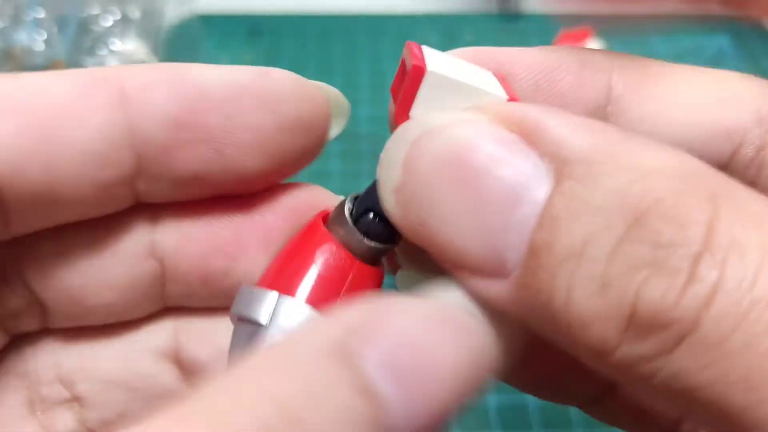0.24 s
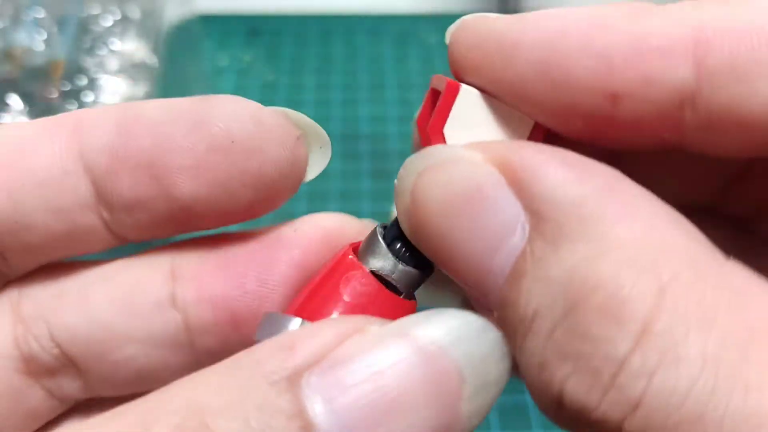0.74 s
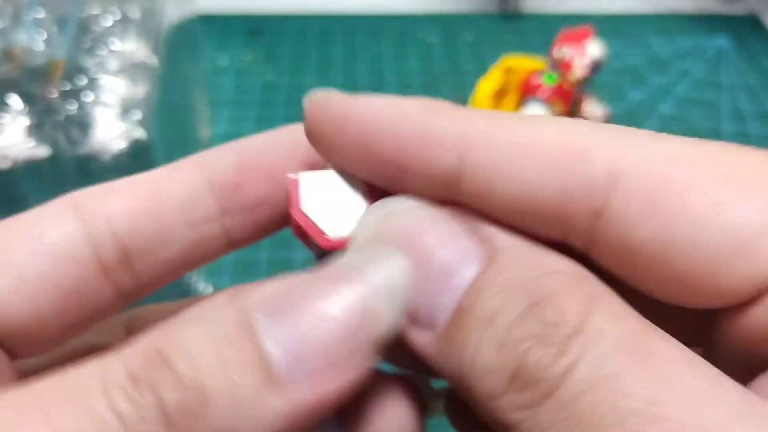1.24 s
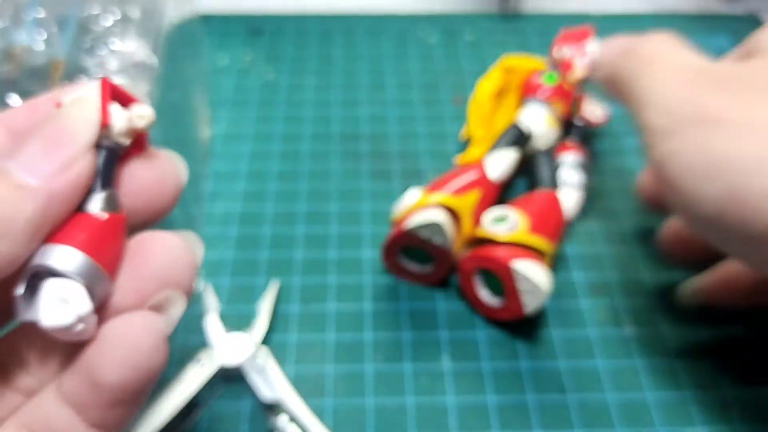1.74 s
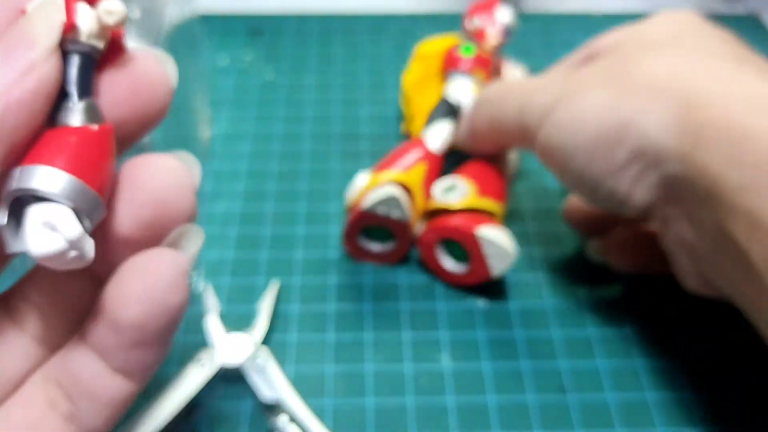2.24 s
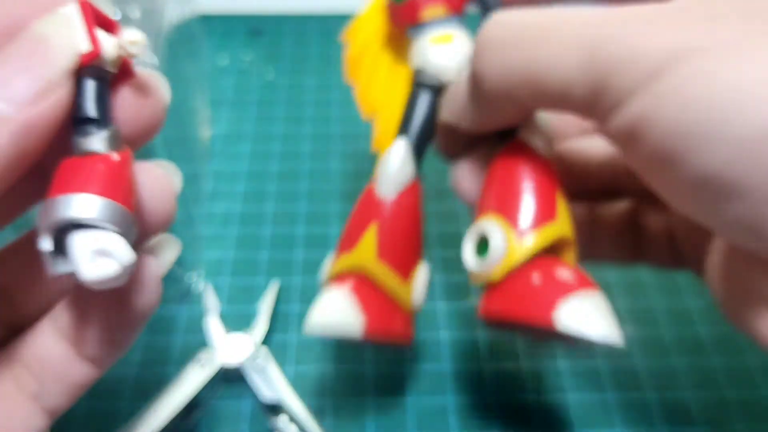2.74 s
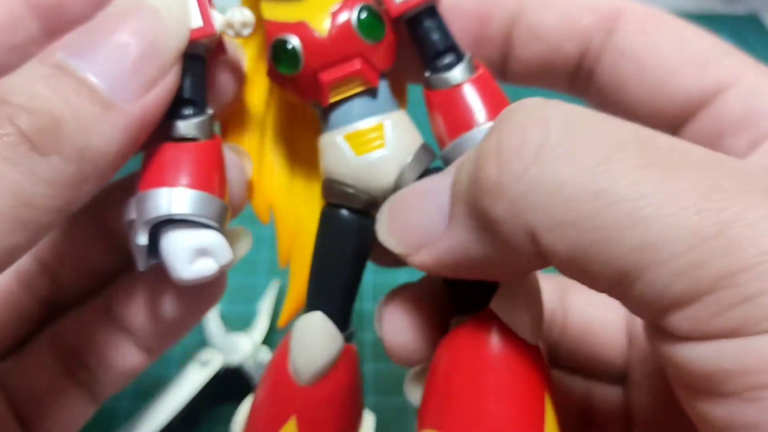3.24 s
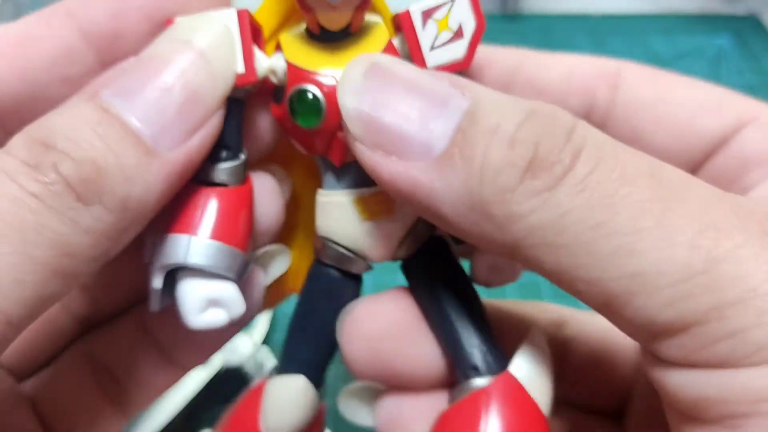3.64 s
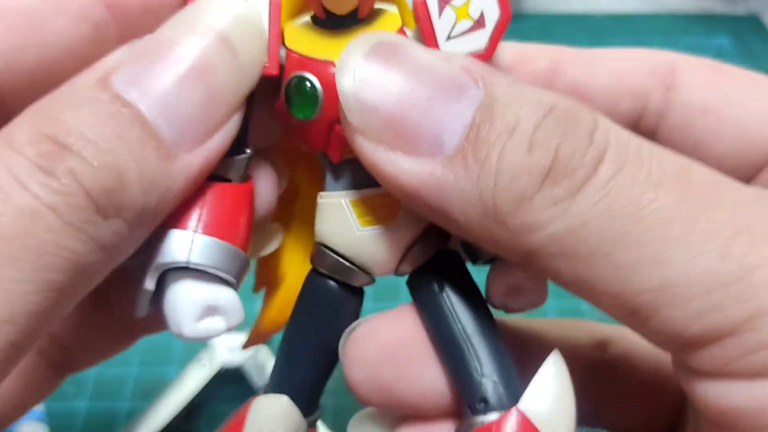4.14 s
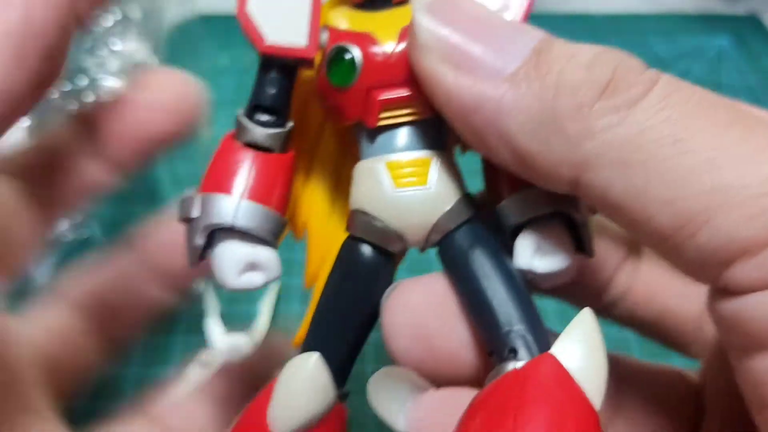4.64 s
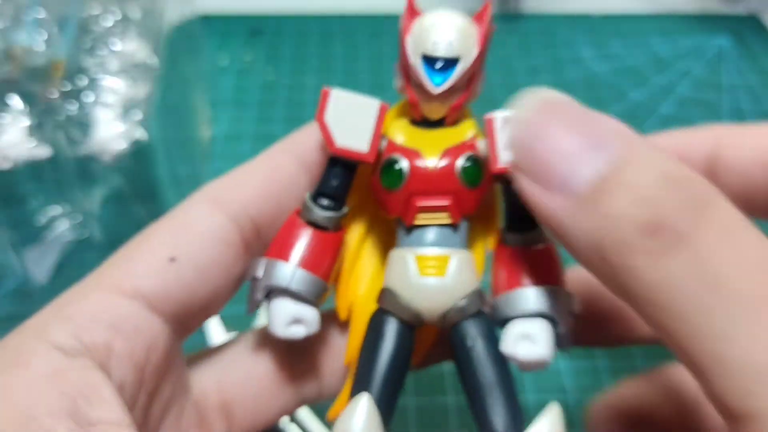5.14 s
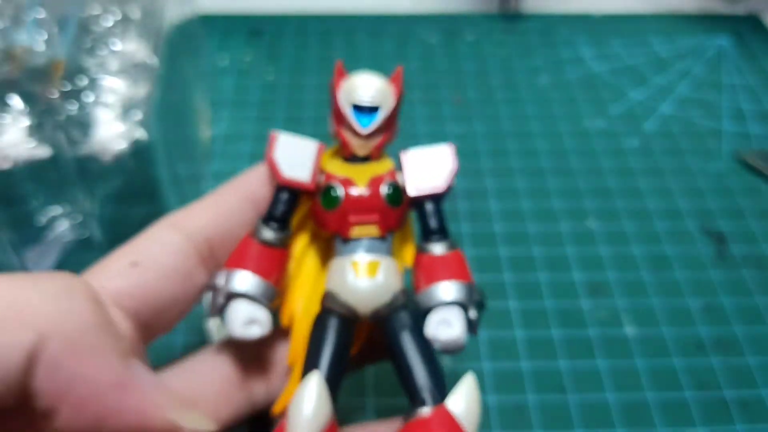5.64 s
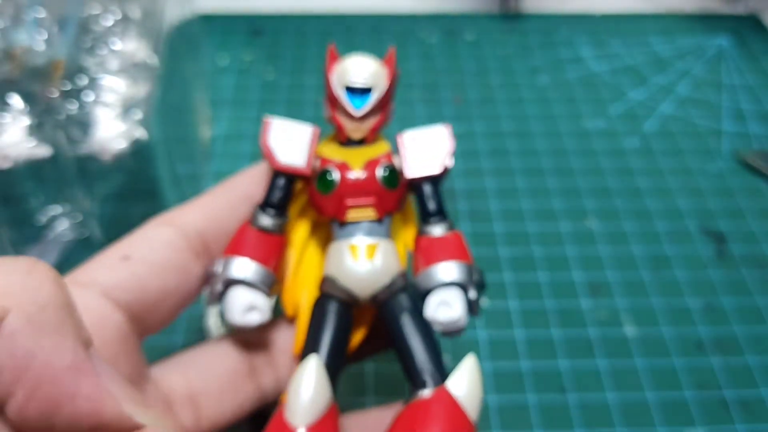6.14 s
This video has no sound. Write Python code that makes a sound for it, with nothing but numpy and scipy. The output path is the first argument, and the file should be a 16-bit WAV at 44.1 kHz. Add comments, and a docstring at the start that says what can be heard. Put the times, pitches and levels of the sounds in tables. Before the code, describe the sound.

A hard-plastic toy figure is handled very close to two microphones at a desk in a small room, over a faint constant fan wash, low rumble and wavering mains hum. From 0.2 to 1.15 s come sparse, dry, high plastic clicks, leaning right, the clearest at 0.44 s. A faint rub passes at 1.4 s and a dull bump at 1.5 s. Between 1.8 and 2.65 s it gets busy: short gritty scrapes with a low stick-slip judder, soft thuds and joint taps, ending in a firmer click at 2.65 s. Quiet rubbing follows near 3.4 s, then a click at 3.6 s. At 3.97 s a click precedes the loudest, sharp bright snap at 4.04 s, with a low thump and tiny rattling rebounds. Small clicks continue, one stronger at 4.55 s and a cluster around 4.8-5.0 s. A faint ping at 5.2 s and soft slide and bump near 5.5 s leave only hum.

```python
"""Posing a hard-plastic figure by hand

Joints snap and parts tap close to two microphones: noisy slips excite short-ringing plastic modes.
The figure is dragged over a cutting mat (stick-slip judder, gritty scrape) and bumps dully;
fingers rub its shell in strokes of fine grains. Desk and small room reflect the clicks.
Underneath: filtered-noise fan wash and rumble, and wavering sine tones of mains and motor hum."""
import sys
import numpy as np
from scipy import signal
from scipy.fft import rfft, irfft
from scipy.io import wavfile
from scipy.ndimage import uniform_filter1d

SR = 44100
rng = np.random.default_rng(int(sys.argv[2]) if len(sys.argv) > 2 else 0)


def to_wav(sig):
    """Store sig (one row per channel, or 1-D mono) as 16-bit WAV at the path in sys.argv[1].

    Samples outside -1..1 are clipped; the rate is SR.
    """
    pcm = np.clip(np.atleast_2d(sig), -1, 1) * 32767
    pcm = np.round(pcm).astype(np.int16)
    wavfile.write(sys.argv[1], SR, pcm.T)  # frames by channels


N = 281358
TIME_S = np.arange(N) / SR

# joint snaps and part taps, snap_db before the common gain, registers relative to the snap:
# start_s, snap_db, knock_db, shell_db, edge_db, lean_db (left minus right), slip_s
CLICKS = [(.1852, -49.5, -17, -8, -21, -28, 0.00096), (.3733, -57.5, -10, 1, -34, -19, 0.00097),
          (0.4401, -31.5, -30, -10, -40, -16, 0.0012), (0.5615, -57.5, -3, -3, -36, -20, 0.0024),
          (0.7796, -45.5, -18, -10.5, -24, -12, 0.0028), (.816, -37, -18.5, -9.5, -11, -6, 0.0016),
          (0.897, -47, -10.5, -3, -29, -7, 0.0028), (.912, -41, -14, -6.5, -16, -5, 0.00067),
          (1.124, -39, -12, -11, -16, -13, .0012), (1.141, -44, -20, -11, -18, -3, 0.00059),
          (1.4, -58, -20, -0.5, -19, -2, 0.0024), (1.5324, -62.5, 1.5, -3, -16, -4, 0.0041),
          (1.954, -43.5, -11, -9, -24, -6, 0.0093), (1.9697, -45.5, -3, -6, -14, -3, 0.0055),
          (2.031, -47, -9, -3.5, -19, -3, 0.0019), (2.0722, -41, -4.5, -7, -13, -3.5, 0.0062),
          (2.358, -42, -31, -14, -15, -8, 0.002), (2.427, -54, -10, -5, -19, -6, .003),
          (2.5128, -41, -13, -10, -19, -8, 0.0091), (2.624, -38.5, -11, -7, -18, -5, 0.0027),
          (2.634, -47, -10, -12, -12, -5, 0.0017), (2.649, -30, -9.5, -9.5, -15.5, -4.5, .0041),
          (3.144, -56.5, -8, -6, -27, -6, 0.0012), (3.5591, -47.5, -15, -11, -26, -8, 0.0021),
          (3.571, -46.5, -16, -6, -23, -15, 0.00079), (3.616, -32.5, -34, -33, -49, -6, 0.00041),
          (3.7709, -43.5, -15.5, -7, -21, -12, 0.0013), (3.851, -59.5, -5, -8, -34, -11, .0015),
          (3.8932, -47, -12, -18, -40, 4.5, 0.0015), (3.9694, -27, -23, -14, -24, -5, 0.0021),
          (4.0375, -19.5, -14, -0.5, -8, 3, 0.00059), (4.133, -43.5, -14, -14, -18, -6, 0.00096),
          (4.1431, -44, -20, -18, -26, -20, 0.00071), (4.155, -45, -22, -13, -28, -18, 0.00074),
          (4.168, -42, -26, -17, -29, -19, 0.0011), (4.1825, -42.5, -16, -11, -25, -9, .0015),
          (4.2213, -39.5, -15, -9.5, -8, -4, 0.0019), (4.442, -54.5, -12, -6, -28, -6, 0.00047),
          (4.5469, -28.5, -32.5, -22.5, -41, -14.5, 0.0013), (4.7653, -51.5, -18, -17, -36, -7, .0012),
          (4.7997, -44, -12, -2, -18, -9, 0.003), (4.8192, -51.5, -9, 3, -18, -7, 0.00088),
          (4.8695, -43.5, -26, -10, -30, -9, 0.0032), (4.8763, -39.5, -19, -17, -33, -15, 0.00067),
          (4.8942, -37.5, -6, -5, -18, -3.5, 0.006), (4.944, -46, -18, -9, -14, -3.5, 0.0036),
          (4.992, -46.5, -8, -10, -32, -6, 0.0016), (5.089, -54.5, -22, -18, -7, -1, 0.0032)]
# modes of the hollow plastic parts: nominal_hz, relative_db
PLASTIC_MODES = [(2150, 2), (2720, 9.5), (3700, 2), (4760, -12.5), (5550, 7.5), (6400, 15), (7700, 16),
                 (8200, 12), (8680, 5), (9400, -5), (14700, 2)]
# click registers, dull push / knock / shell / snap / edge: low_hz, high_hz
REGISTERS = [(170, 1500), (1750, 4500), (4300, 6200), (6900, 9400), (10000, 15500)]
# left and right microphone port resonances: centre_hz, width_hz
PORTS = [(9010, 680), (7300, 1800)]
# spells of shifting grip: start_s, end_s
FIDGETS = [(.495, .525), (1.34, 1.37), (2.0, 2.03), (2.53, 2.62), (4.76, 5.0)]
# light taps leaving one part ringing: start_s, level_db, pitch_hz
PINGS = [(3.8934, -49, 2710), (3.97, -48, 2950), (5.2365, -50.5, 2950)]
# dull bumps of the figure in the hand or on the mat: start_s, level_db, nominal_pitch_hz, t60_s
BUMPS = [(1.531, -32, 394, 0.039), (2.185, -32.5, 289, 0.16), (2.348, -38.5, 269, 0.14),
         (2.489, -30, 383, .05), (2.594, -30, 646, 0.046), (4.038, -24.5, 250, 0.032),
         (5.505, -40, 336, 0.13)]
# shoves over the mat and through the hand, levels before the drag gains:
# start_s, end_s, judder_db, scrape_db
SHOVES = [(1.83, 1.875, -57, -59.5), (1.95, 2.119, -52.5, -54), (2.106, 2.145, -48.5, -57.5),
          (2.18, 2.275, -52, -45.5), (2.35, 2.442, -51.5, -52), (2.421, 2.531, -42.5, -56),
          (2.512, 2.607, -47.5, -49), (2.588, 2.635, -50, -52), (5.43, 5.614, -54, -67)]
# scrape spectrum: freq_hz, relative_db (per Hz)
SCRAPE_SPECTRUM = [(100, -26), (270, 7.5), (600, 15), (850, 9.5), (1200, 5), (2500, -1), (5000, -11),
                   (8000, 3.5), (10500, -21.5), (15000, -30)]
# skin and joints rubbing: middle_s, length_s, level_db, lean_db (left minus right)
RUBS = [(0.49, 0.079, -66, -15), (1.395, 0.17, -59, 0.5), (2.62, 0.12, -47, -2.5), (2.698, 0.098, -55, 0.5),
        (3.407, .08, -51, -6.5), (3.439, 0.036, -51, -9), (3.541, 0.13, -60.5, -3),
        (4.17, 0.067, -54.5, -3), (4.868, 0.048, -49.5, -4), (4.998, .07, -55.5, -1), (5.529, 0.19, -59, 1)]
# rub spectrum: freq_hz, relative_db (per Hz)
RUB_SPECTRUM = [(700, -16), (2000, 3.5), (4000, -1), (6000, -3), (8500, 0), (10500, -9), (15000, -16)]
# fan wash spectrum: freq_hz, relative_db (per Hz)
FAN_SPECTRUM = [(80, -30), (125, -14), (180, -2), (225, -13), (300, -4.5), (560, -12), (780, -8.5),
                (1280, -15), (4300, -31), (6200, -31), (7700, -22), (9400, -31.5), (10500, -52),
                (15000, -66)]
# low rumble spectrum: freq_hz, relative_db (per Hz)
RUMBLE_SPECTRUM = [(15, -10), (30, -1), (42, 4.5), (60, -9), (105, -25), (200, -66)]
# likeness of the two background channels: freq_hz, correlation (-1 to 1)
BACKGROUND_LIKENESS = [(150, 0.88), (380, 0.74), (950, -0.16), (6000, 0.032)]
# background balance: freq_hz, lean_db (left minus right)
BACKGROUND_LEAN = [(120, 4.5), (950, 2.5), (3770, 0), (7520, -6.5), (9500, 3.5)]
# mains and motor tones: pitch_hz, level_db
HUM_TONES = [(85.5, -68), (91.5, -69.5), (100, -59), (194, -72)]

RING_DB, RING_T60_S = -30, .0090  # plastic modes
RATTLE_START_S, RATTLE_GAP_S, RATTLE_GROWTH, RATTLE_COUNT = 4.0402, .002, 2, 4
JUDDER_HZ = 196.9  # stick-slip rate at full speed
EDGE_HZ = 16300  # upper band limit


def amp(db):
    """Decibels to gain."""
    return 10 ** (np.asarray(db) / 20)


def evened(x):
    """Scales to rms 1."""
    return x / np.sqrt(np.mean(x ** 2) + 1e-30)


def read(points, hz):
    """Interpolates a curve on a log-frequency axis."""
    f, value = np.transpose(points)
    return np.interp(np.log(hz + 1), np.log(f + 1), value)


def add(mix, start_s, sound):
    """Adds a sound into the mix in place, cut at the end."""
    part = mix[..., round(start_s * SR):][..., :sound.shape[-1]]
    part += sound[..., :part.shape[-1]]


def panned(lean_db):
    """Left and right gains of mean power 1."""
    return evened(amp([[lean_db / 2], [-lean_db / 2]]))


def coloured(x, points):
    """Shapes x by a spectrum, at rms 1."""
    return evened(irfft(rfft(x) * amp(read(points, np.fft.rfftfreq(N, 1 / SR))), N))


def filtered(x, cutoff_hz, kind, order=4):
    """Causal Butterworth filter."""
    return signal.sosfilt(signal.butter(order, cutoff_hz, kind, fs=SR, output="sos"), x)


def joints(gain_db=-7.0, desk_db=-9.5, room_db=-16.0, room_drying=0.41, desk_drying=0.19):
    """All clicks with reflections; those right beside one microphone are drier."""
    direct, to_desk, to_room = np.zeros((3, 2, N))
    for start_s, snap_db, knock_db, shell_db, edge_db, lean_db, slip_s in CLICKS + rattle() + ticks():
        sound = amp(gain_db) * click(snap_db, knock_db, shell_db, edge_db, lean_db, slip_s)
        add(direct, start_s, sound)
        add(to_desk, start_s, sound * amp(-desk_drying * abs(lean_db)))
        centred = sound / panned(lean_db)
        add(to_room, start_s, centred * amp(-room_drying * abs(lean_db)))
    return direct + amp(desk_db) * desk(to_desk) + amp(room_db) * room(to_room)


def click(snap_db, knock_db, shell_db, edge_db, lean_db, slip_s, rise_share=0.087, detune=0.032,
          dull_db=-17, lumpy=0.16, jolt=2.0):
    """A jolt and an uneven burst of slips excite plastic that, held in the fingers, rings briefly."""
    t = np.arange(SR // 25) / SR
    smoothed = uniform_filter1d(rng.standard_normal(len(t)), size=60)
    lumps = np.exp(lumpy * evened(smoothed))
    burst = rng.standard_normal((2, len(t))) * lumps * np.exp(-t / slip_s)
    burst[[0, 1], rng.integers(0, 16, 2)] += jolt
    burst *= 1 - np.exp(-t / (rise_share * slip_s))  # long slips start softly

    body = np.zeros((2, len(t)))
    body[:, 0] = 1
    decay = np.exp(-np.log(1000) * t / RING_T60_S)
    for hz, db in PLASTIC_MODES:
        shifted_hz = hz * (1 + detune * rng.standard_normal())  # each grip shifts the modes
        mode = decay * np.cos(2 * np.pi * shifted_hz * t)
        body += amp(RING_DB + db) * mode * (.5 + rng.random((2, 1)))
    ring = ports(signal.fftconvolve(burst, body, axes=1)[:, :len(t)])

    # the striking place weights the registers; a dull push comes with the knock
    levels_db = (knock_db + dull_db, knock_db, shell_db, 0, edge_db)
    out = 0
    for band_hz, db in zip(REGISTERS, levels_db):
        part = filtered(ring, band_hz, "bandpass")
        out = out + amp(db) * np.array([evened(side) for side in part])
    return amp(snap_db) * panned(lean_db) * out


def rattle(first_db=-26, fall_db=8, knock_db=-12, shell_db=-4, edge_db=-17, slip_s=0.0022):
    """Click rows of a seated part's rebounds: weakening, at uneven, widening gaps."""
    rows, start_s = [], RATTLE_START_S
    for k, jitter in enumerate(rng.uniform(-1.3, 1, RATTLE_COUNT)):
        rows.append((start_s, first_db - fall_db * k, knock_db, shell_db, edge_db, 0, slip_s))
        start_s += RATTLE_GAP_S * RATTLE_GROWTH ** k * (1 + .5 * jitter)
    return rows


def ticks(per_s=12, snap_db=-58, spread_db=3, knock_db=-8, shell_db=-6, edge_db=-22, lean_db=-9,
          slip_s=0.0015):
    """Click rows of loose parts ticking faintly, scattered over each change of grip."""
    rows = []
    for start_s, end_s in FIDGETS:
        count = max(1, round(per_s * (end_s - start_s)))
        for k, (when, size) in enumerate(rng.random((12, 2))[:count]):
            tick_s = start_s + (end_s - start_s) * (k + when) / count
            tick_db = snap_db + spread_db * (2 * size - 1)
            rows.append((tick_s, tick_db, knock_db, shell_db, edge_db, lean_db, slip_s))
    return rows


def ports(x, ring_db=10):
    """Each microphone port adds its own resonance."""
    rings = []
    for side, (hz, width_hz) in zip(x, PORTS):
        b, a = signal.iirpeak(hz, hz / width_hz, SR)
        rings.append(signal.lfilter(b, a, side))
    return x + amp(ring_db) * np.array(rings)


def desk(x, t60_s=0.036):
    """Quick dense reflections between the hands and the desk."""
    t = np.arange(SR // 16) / SR
    taps = rng.standard_normal((2, len(t))) * (t > .0015) * amp(-60 * t / t60_s)
    return signal.fftconvolve(x, taps / np.linalg.norm(taps[0]), axes=1)[:, :N]


def room(x, t60_s=0.34, treble_t60_s=0.11, gap_s=.003):
    """Sparse reflections of random sign; those above 10 kHz die sooner."""
    t = np.arange(SR // 2) / SR
    kept = rng.random((2, len(t))) < .15
    taps = rng.standard_normal((2, len(t))) * kept * (t > gap_s)
    low = filtered(taps, 10000, "lowpass")
    high = filtered(taps, 10000, "highpass")
    tail = low * amp(-60 * t / t60_s) + high * amp(-60 * t / treble_t60_s)
    return signal.fftconvolve(x, tail / np.linalg.norm(tail[0]), axes=1)[:, :N]


def pings(t60_s=0.024, lean_db=-2):
    """A small part, left free, rings as one decaying sine."""
    out, t = np.zeros(N), np.arange(SR // 25) / SR
    for start_s, db, hz in PINGS:
        add(out, start_s, amp(db - 60 * t / t60_s) * np.sin(2 * np.pi * hz * t))
    return out * panned(lean_db)


def bumps(lean_db=3, rise_s=0.0021, spread=0.25):
    """Soft blows ring three heavily damped low modes around one pitch."""
    out, t = np.zeros(N), np.arange(SR // 6) / SR
    for start_s, db, hz, t60_s in BUMPS:
        offsets = np.linspace(-1, 1, 3) + rng.uniform(-0.37, 0.66, 3)
        modes_hz = hz * np.exp(spread * offsets)
        thud = np.sin(2 * np.pi * np.outer(t, modes_hz)).mean(1)
        soft_rise = 1 - np.exp(-t / rise_s)
        add(out, start_s, amp(db - 60 * t / t60_s) * thud * soft_rise)
    return out * panned(lean_db)


def drag(judder_gain_db=1, scrape_gain_db=1, rough=0.87, lean_db=2, apart=0.73, glide=0.19):
    """Stick-slip: an uneven low judder whose pitch and level follow speed, under a gritty scrape."""
    judder_env, scrape_env, pitch_hz = np.zeros((3, N))
    for start_s, end_s, judder_db, scrape_db in SHOVES:
        speed = np.sqrt(np.hanning(int((end_s - start_s) * SR)))
        add(judder_env, start_s, amp(judder_db) * speed)
        add(scrape_env, start_s, amp(scrape_db) * np.sqrt(speed))
        pitch_hz[round(start_s * SR):][:len(speed)] = JUDDER_HZ * (1 - glide * (1 - speed))

    phase = 2 * np.pi * np.cumsum(pitch_hz) / SR
    roughness = [(25, -4), (70, -4.5), (200, -26), (600, -75)]  # freq_hz, relative_db
    a, b = coloured(rng.standard_normal((2, N)), roughness)
    judder = evened((1 + rough * a) * np.cos(phase) + rough * b * np.sin(phase))
    judder = filtered(judder, 135, "highpass")  # keeps the judder free of deep bass

    slips = grains(per_s=5000, spread_db=0.0) * catches(depth_db=2, per_s=150)
    grit, side = coloured(slips, SCRAPE_SPECTRUM)
    scrape = evened(np.array([grit + apart * side, grit - apart * side]))
    judder = amp(judder_gain_db) * judder_env * judder
    scrape = amp(scrape_gain_db) * scrape_env * scrape
    return panned(lean_db) * (judder + scrape)


def rubs(edge_db=3, dulling=3.1):
    """Strokes of fine friction grains; strokes leaning to one side are duller above 10 kHz."""
    low_env, edge_env = np.zeros((2, 2, N))
    for middle_s, length_s, db, lean_db in RUBS:
        stroke = amp(db) * panned(lean_db) * np.sqrt(np.hanning(int(length_s * SR)))
        start_s = middle_s - length_s / 2
        add(low_env, start_s, stroke)
        add(edge_env, start_s, stroke * amp(edge_db - dulling * abs(lean_db)))
    slips = grains(per_s=7000, spread_db=-3.5) * catches(depth_db=5.5, per_s=100)
    grit = evened(ports(coloured(slips, RUB_SPECTRUM), ring_db=8))
    low = signal.sosfiltfilt(signal.butter(6, 10000, fs=SR, output="sos"), grit)
    return low_env * low + edge_env * (grit - low)


def grains(per_s, spread_db):
    """Friction as a random train of tiny slips of uneven size."""
    size_db = spread_db * np.minimum(rng.exponential(1, (2, N)), 4)
    size = amp(size_db) * rng.standard_normal((2, N))
    return size * (rng.random(N) < per_s / SR)


def catches(depth_db, per_s):
    """Uneven pressure: friction swells and slackens between random knots."""
    knots_s = np.arange(0, TIME_S[-1] + 1, 1 / per_s)
    pressure = rng.uniform(-0.98, 1, 4096)[:len(knots_s)]
    return evened(amp(depth_db * np.interp(TIME_S, knots_s, pressure)))


def fan(wash_db=-55, rumble_db=-63):
    """Steady air wash over low rumble: noise partly shared between the channels."""
    hz = np.fft.rfftfreq(N, 1 / SR)
    a, b = rfft(rng.standard_normal((2, N)))
    likeness = np.clip(read(BACKGROUND_LIKENESS, hz), -1, 1)
    lean_db = read(BACKGROUND_LEAN, hz)
    left = a * amp(lean_db / 2)
    right = (likeness * a + np.sqrt(1 - likeness ** 2) * b) * amp(-lean_db / 2)
    pair = irfft([left, right], N)
    return amp(wash_db) * coloured(pair, FAN_SPECTRUM) + amp(rumble_db) * coloured(pair, RUMBLE_SPECTRUM)


def hum(waver_rad=0.26, lean_db=6.0):
    """Mains hum and motor tones beat together, each with a wavering phase."""
    out = 0
    waver_spectrum = [(1, -22.5), (4, -18.5), (15, -34.0), (60, -100)]  # freq_hz, relative_db
    for hz, db in HUM_TONES:
        drift = coloured(rng.standard_normal(N), waver_spectrum)
        waver = waver_rad * hz / HUM_TONES[0][0] * drift  # grows with pitch
        tone = np.sin(2 * np.pi * (hz * TIME_S + rng.random()) + waver)
        out = out + amp(db) * np.sqrt(2) * tone
    return out * panned(lean_db)


def scene():
    """The figure in the hands, over the background."""
    return joints() + pings() + bumps() + drag() + rubs() + fan() + hum()


def record(dry):
    """Input softly limits peaks, then a linear-phase lowpass."""
    limited = .85 * np.tanh(dry / .85)
    lowpass = signal.firwin(255, EDGE_HZ, window=("kaiser", 9), fs=SR)
    return signal.oaconvolve(limited, lowpass[None], "same")


dry = scene()
out = record(dry)
to_wav(out)
```